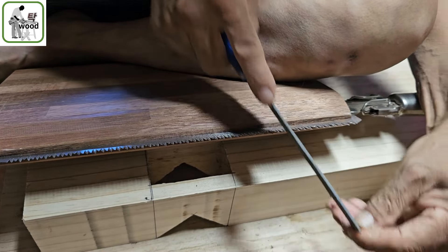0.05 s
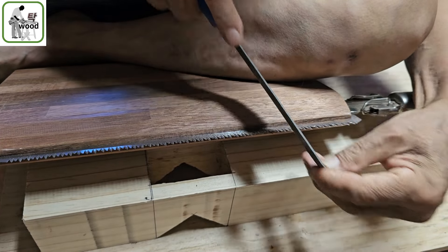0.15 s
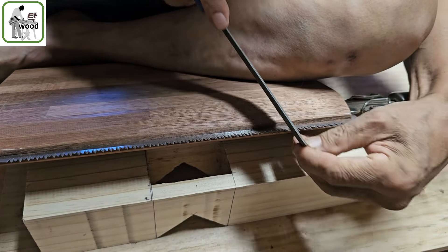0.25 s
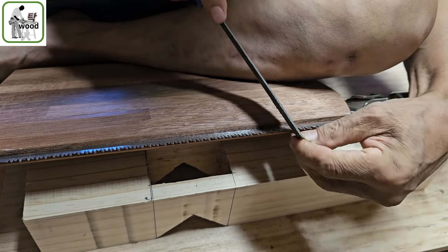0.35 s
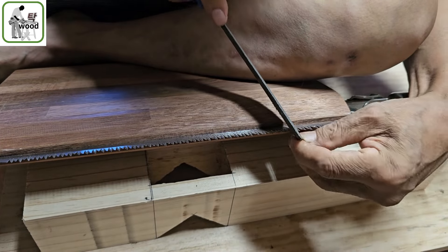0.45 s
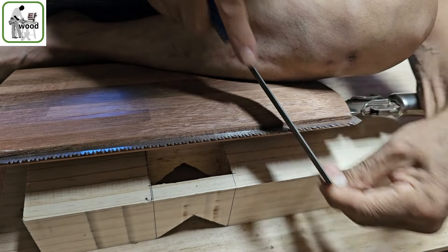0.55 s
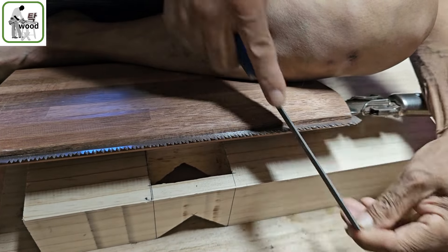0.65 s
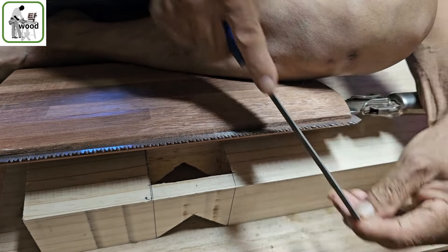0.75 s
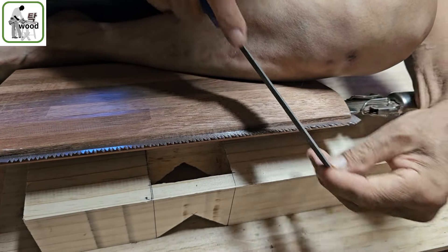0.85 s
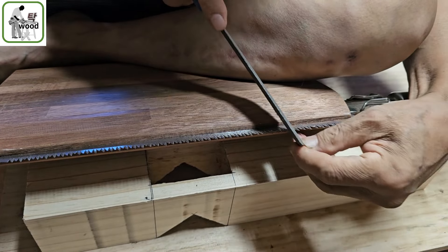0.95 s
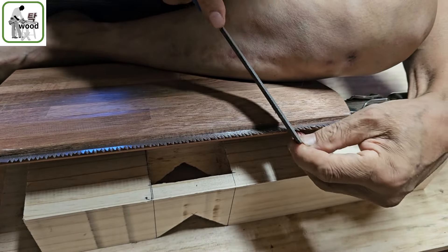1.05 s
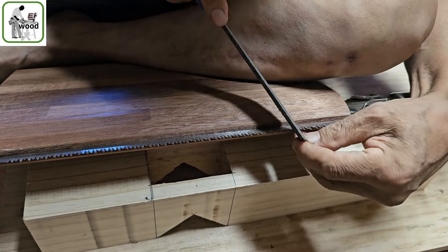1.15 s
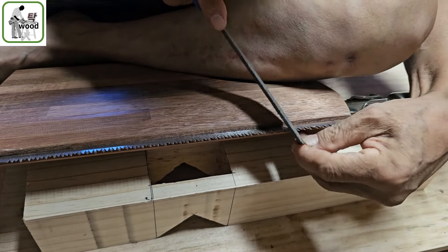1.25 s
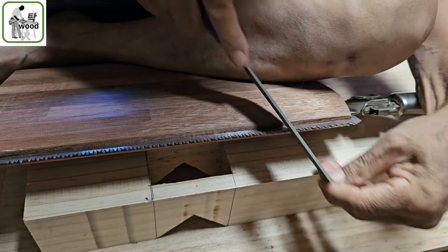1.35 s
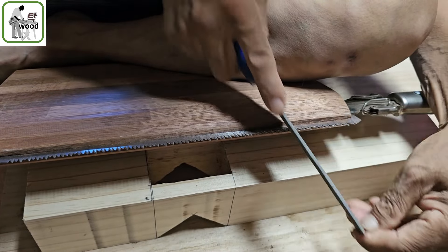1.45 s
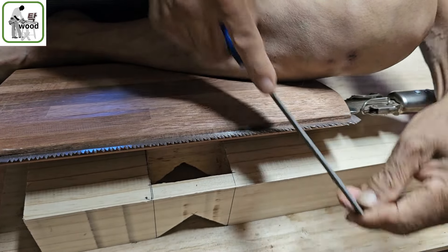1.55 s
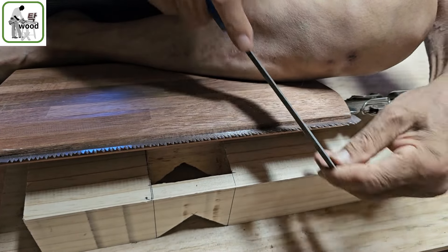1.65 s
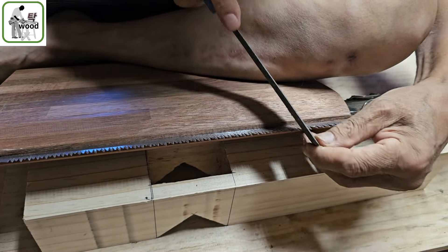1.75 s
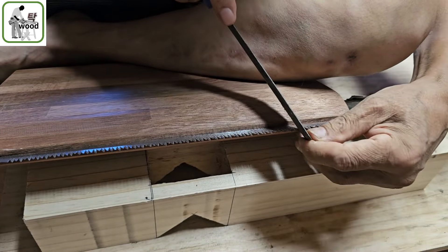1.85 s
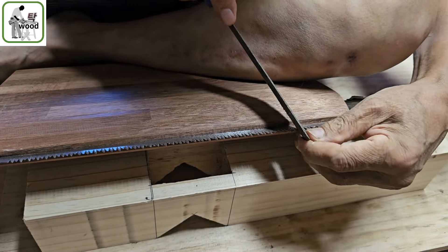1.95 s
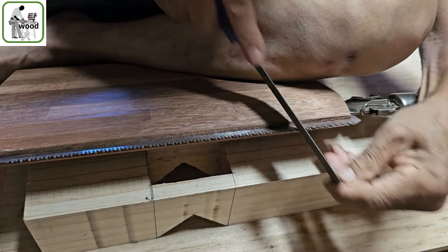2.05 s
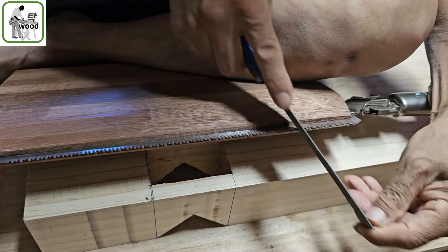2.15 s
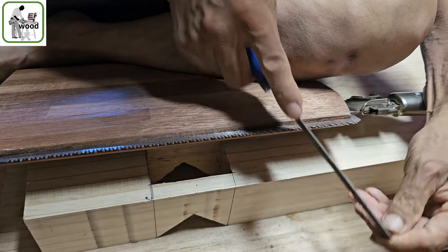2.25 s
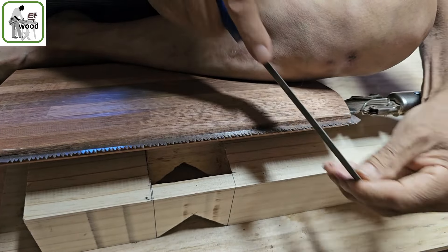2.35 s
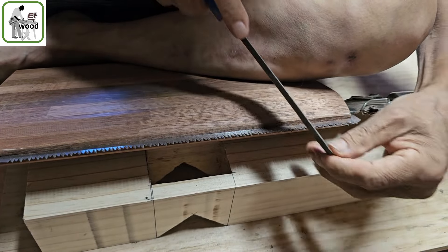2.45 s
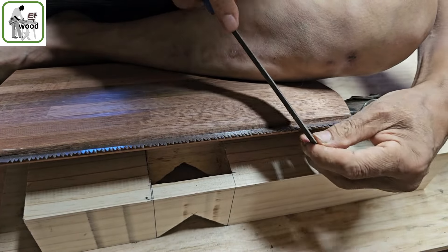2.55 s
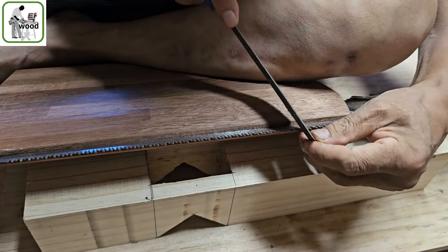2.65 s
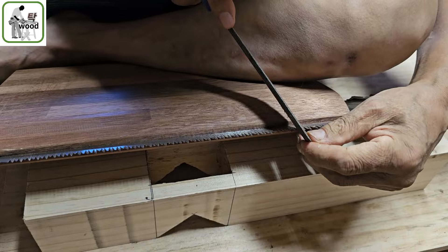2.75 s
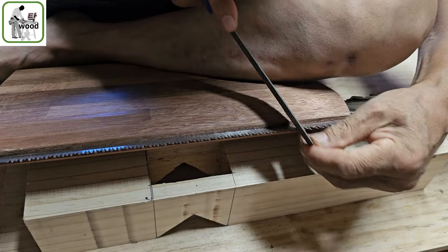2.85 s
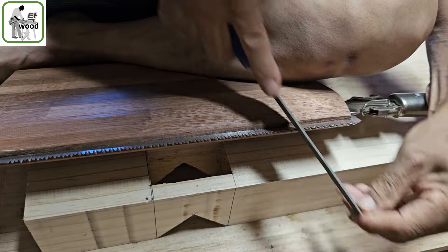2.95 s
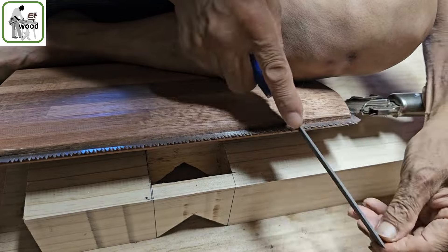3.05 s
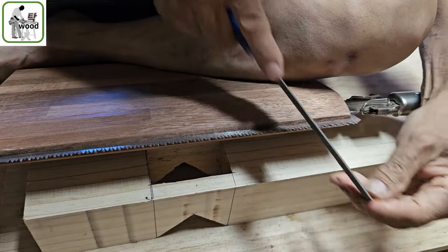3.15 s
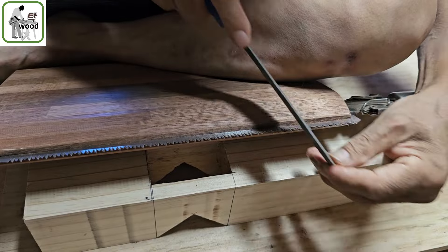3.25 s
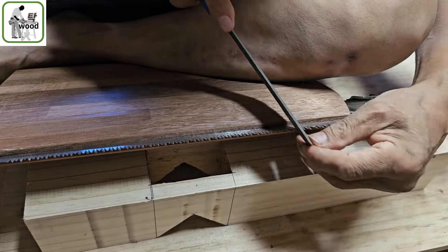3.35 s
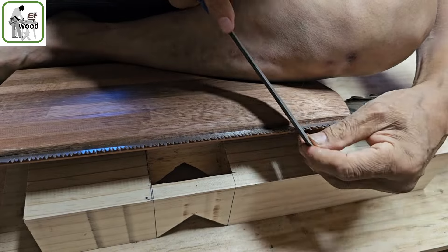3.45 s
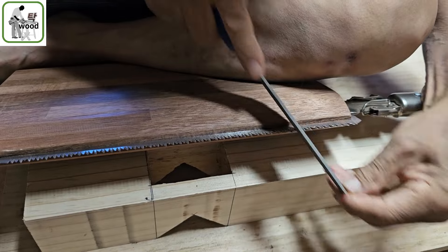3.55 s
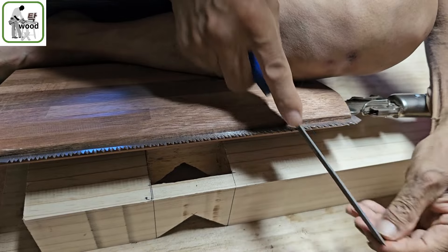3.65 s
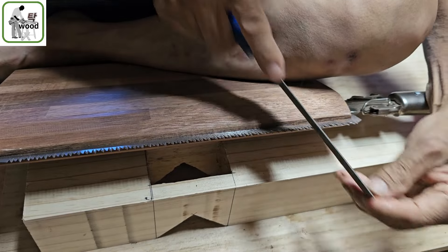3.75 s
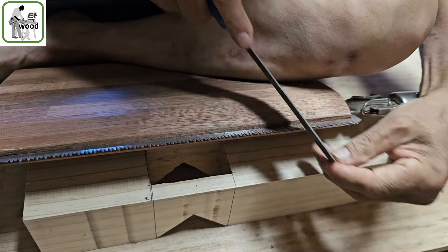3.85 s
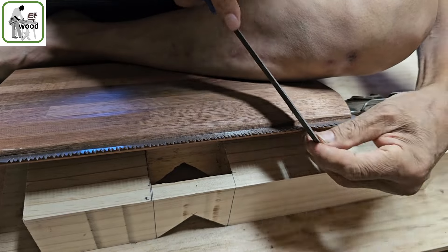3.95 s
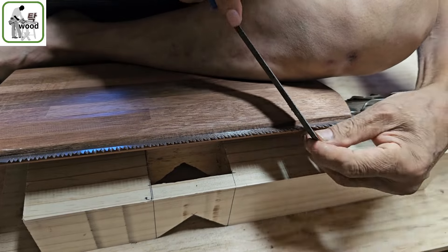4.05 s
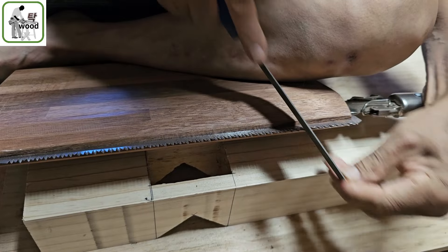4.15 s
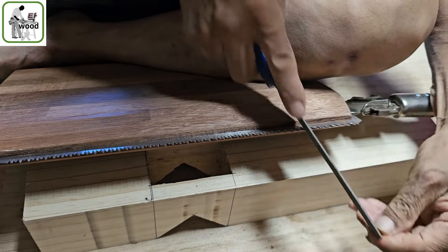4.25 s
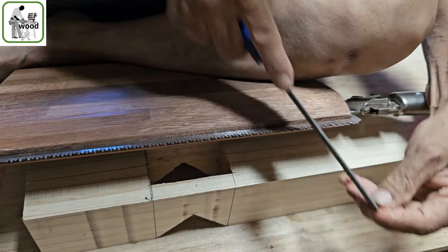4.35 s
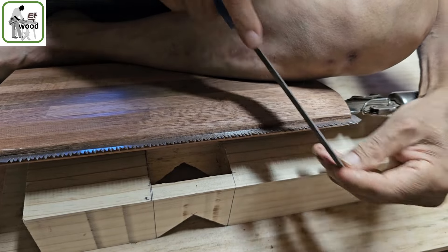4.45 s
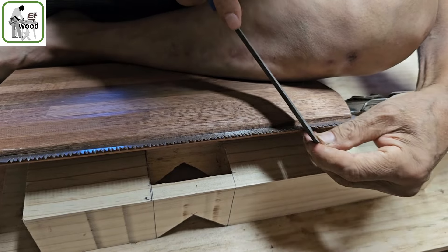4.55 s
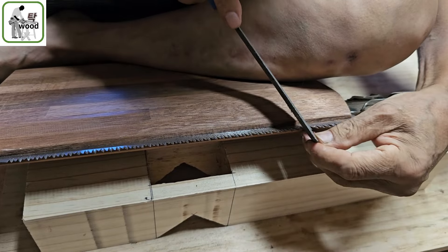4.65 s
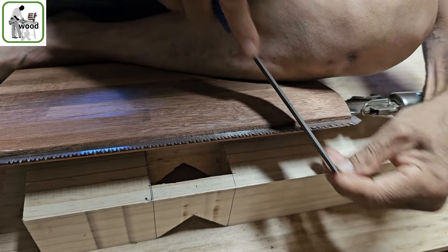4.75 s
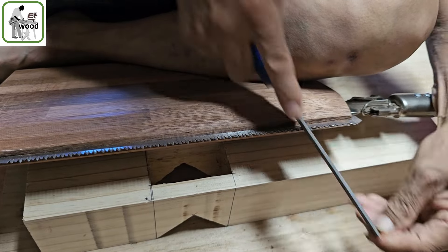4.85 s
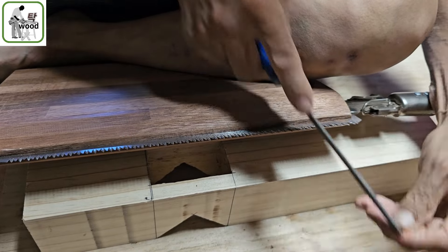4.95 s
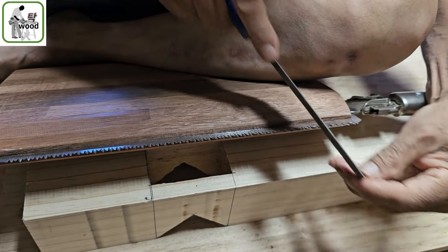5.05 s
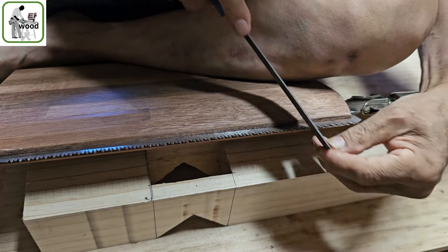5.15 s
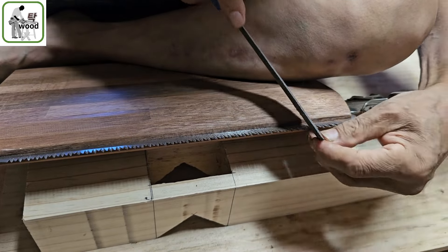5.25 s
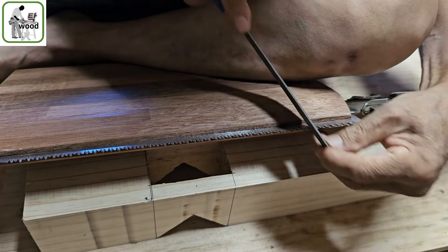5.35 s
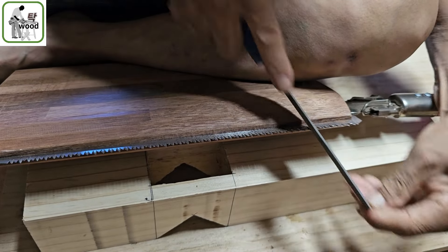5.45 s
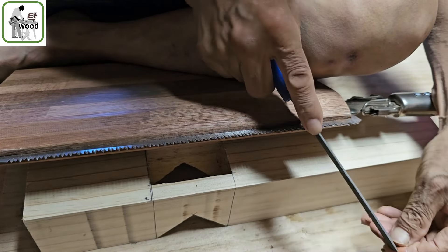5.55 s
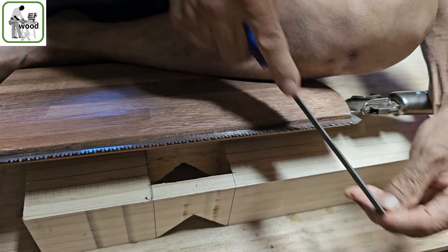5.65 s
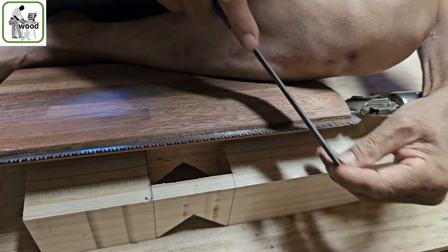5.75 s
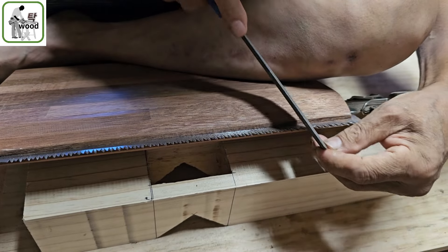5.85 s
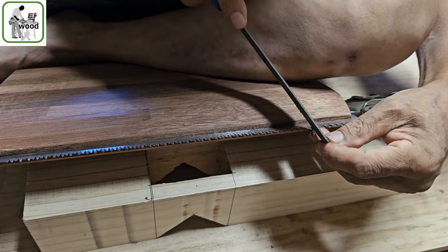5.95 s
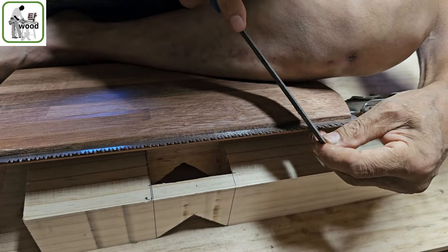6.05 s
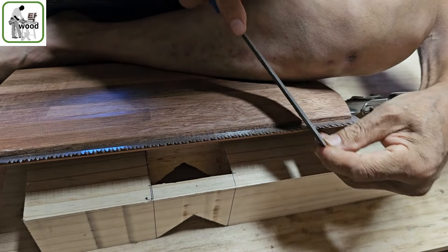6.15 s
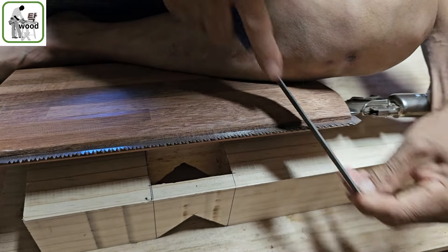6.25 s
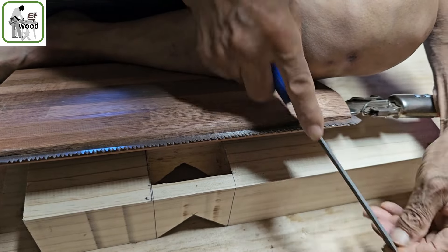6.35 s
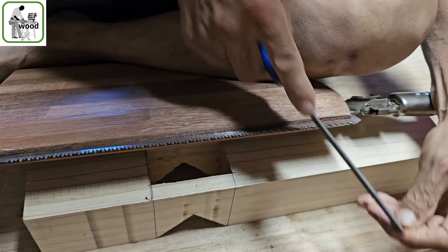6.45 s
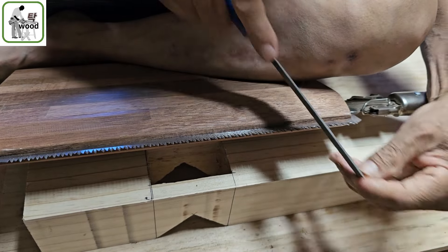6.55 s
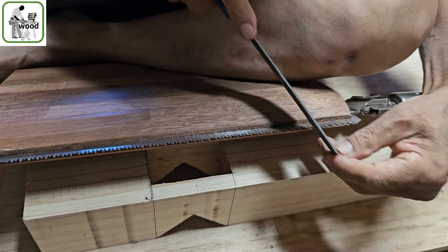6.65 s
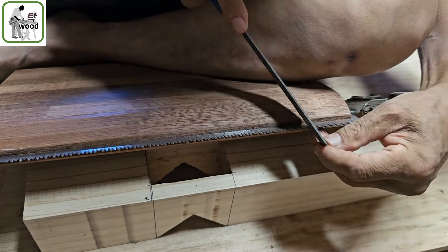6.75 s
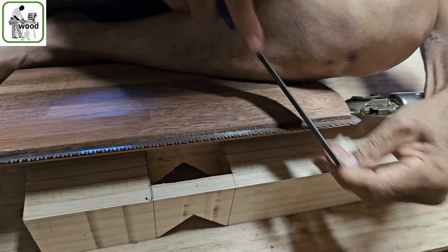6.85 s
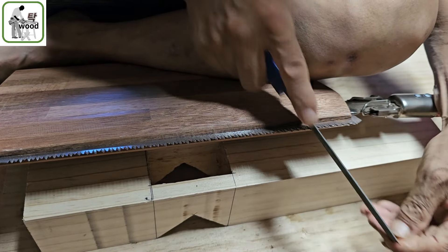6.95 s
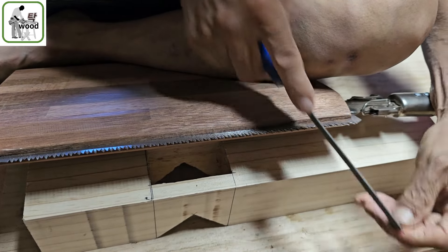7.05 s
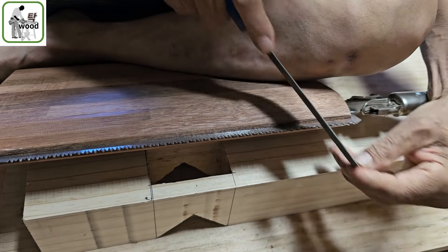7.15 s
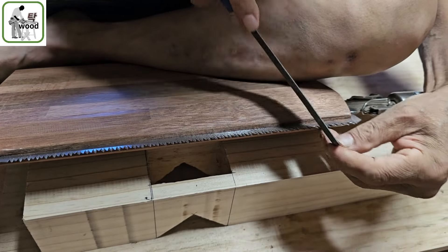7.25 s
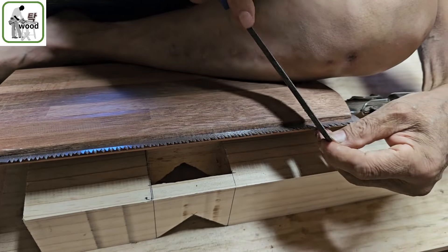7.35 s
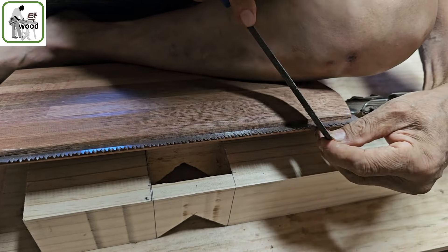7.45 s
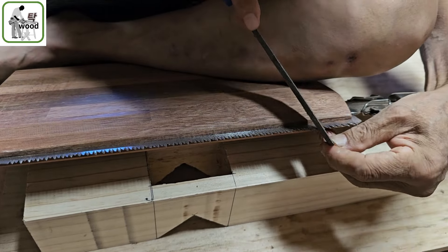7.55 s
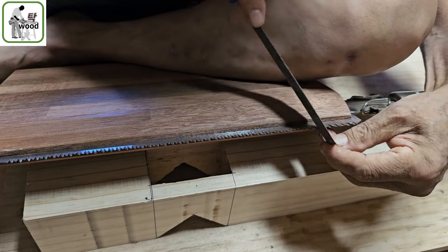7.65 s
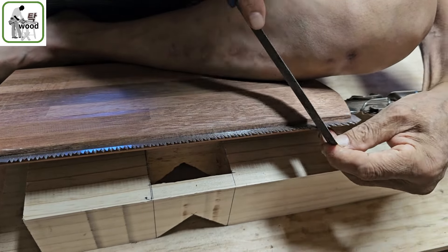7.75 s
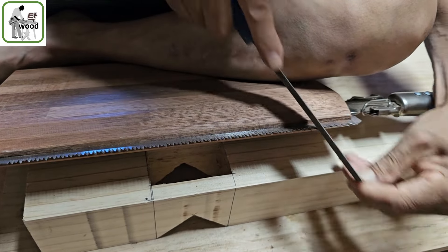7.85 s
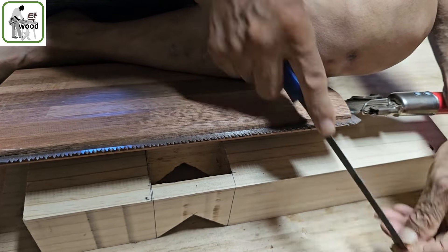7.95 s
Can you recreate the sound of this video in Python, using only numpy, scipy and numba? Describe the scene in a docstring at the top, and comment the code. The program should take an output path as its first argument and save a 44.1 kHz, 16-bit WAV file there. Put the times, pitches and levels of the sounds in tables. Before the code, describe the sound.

Twelve brief gritty file strokes on a clamped saw blade, ticking and ringing, with a small squeak midway and faint hiss and buzz beneath.

```python
"""A slim steel file is pushed in short strokes across the teeth of a handsaw clamped in a wooden jig.
Its ridges catch as a dense shower of random ticks that rasp and ring boards, blade and file in a small room.
Sharp taps of the file on a tooth, light brushes and squeaks come in between, and a click near the end.
Under it lie hiss and mains harmonics, sinking as a noise suppressor closes after each stroke."""
import sys
import numpy as np
from scipy import signal
from scipy.fft import rfft, irfft, next_fast_len
from scipy.io import wavfile
from scipy.ndimage import uniform_filter1d
from numba import njit

SR = 44100
rng = np.random.default_rng(int(sys.argv[2]) if len(sys.argv) > 2 else 0)


def bounce(signal):
    """Save signal as a 16-bit WAV file at the path given by the first command-line argument."""
    frames = np.transpose(np.atleast_2d(signal))
    limited = np.clip(frames, -1, 1)
    pcm = np.round(limited * 32767).astype(np.int16)
    wavfile.write(sys.argv[1], SR, pcm)


N = 352359


def amp(db):
    """Amplitude factor of a level in dB."""
    return 10 ** (np.asarray(db) / 20)


def unit(x):
    """Scale to an rms of 1."""
    return x / np.sqrt(np.mean(x ** 2))


def on_log(table, hz):
    """Read (freq_hz, value) points on a log-frequency axis."""
    freq_hz, value = np.transpose(table)
    return np.interp(np.log(hz + 1), np.log(freq_hz), value)


def colour(x, table, scale=0.96):
    """Causal filter whose gain is scale times the (freq_hz, gain_db) points, from the folded cepstrum."""
    size = 2048
    gain_db = scale * on_log(table, np.fft.rfftfreq(size, 1 / SR))
    cepstrum = irfft(gain_db * np.log(10) / 20)
    # folding makes the filter minimum phase
    cepstrum[1:size // 2] *= 2
    cepstrum[size // 2 + 1:] = 0
    impulse = irfft(np.exp(rfft(cepstrum)))
    wide = next_fast_len(N + size)
    return irfft(rfft(np.atleast_2d(x), wide) * rfft(impulse, wide), wide)[:, :N]


def ring(x, modes):
    """Sum of resonances excited by x, neighbours in opposite phase."""
    total = 0
    for k, (pitch_hz, width_hz, level_db) in enumerate(modes):
        b, a = signal.iirpeak(pitch_hz, pitch_hz / width_hz, fs=SR)
        total = total + (-1) ** k * amp(level_db) * signal.lfilter(b, a, x)
    return total


def wander(rate_hz):
    """Random levels held 1 / rate_hz s and smoothed; rms 1."""
    hold = int(SR / rate_hz)
    steps = np.repeat(rng.standard_normal(N // hold + 1), hold)
    return unit(uniform_filter1d(steps, hold)[:N])


# Pressure of the file in each stroke, touch-down to lift-off: lists of time_s, rasp_db (before layer trims)
STROKE_PRESSURE = [
    [(0.0, -33), (0.032, -41), (0.07, -52)],
    [(0.537, -43), (0.569, -33.5), (0.581, -37), (0.615, -29.5), (0.685, -38.5), (0.73, -50)],
    [(1.346, -45.5), (1.374, -37.5), (1.44, -41), (1.45, -32), (1.518, -45), (1.53, -52.5)],
    [(2.048, -38), (2.078, -38), (2.09, -29.5), (2.118, -27.5), (2.174, -41.5), (2.246, -42), (2.26, -50)],
    [(2.897, -56), (2.913, -40), (2.977, -31), (3.09, -47.5)],
    [(3.515, -66.5), (3.553, -44.5), (3.599, -38), (3.661, -35.5), (3.71, -46.5)],
    [(4.152, -56), (4.162, -51.5), (4.18, -32), (4.242, -31.5), (4.276, -35.5), (4.294, -33.5), (4.35, -46)],
    [(4.78, -36.5), (4.864, -33.5), (4.912, -34.5), (4.94, -44.5)],
    [(5.413, -43), (5.435, -34.5), (5.509, -28.5), (5.587, -41.5), (5.61, -47.5)],
    [(6.214, -53), (6.254, -41.5), (6.262, -32.5), (6.276, -36.5), (6.298, -27), (6.332, -31.5),
     (6.42, -48)],
    [(6.872, -49), (6.898, -37), (6.956, -34.5), (7.022, -37.5), (7.04, -48)],
    [(7.835, -44.5), (7.863, -32.5), (7.969, -37), (7.977, -28), (7.99, -36.5)],
]
# How each stroke's grip lets the parts ring, in dB over the rasp (before drift, follow and layer trims):
# boards_start_db, boards_middle_db, boards_end_db, hum_start_db, hum_middle_db, hum_end_db,
# overtones_db, file_ring_db, steel_db, then the blade hum's hum_start_hz, hum_end_hz
STROKE_GRIPS = [(7.5, 1.5, 4.5, -1, -3, -2, -2, -32, 8.5, 447, 461),
                (-4.5, -6.5, -1.5, 3.5, 1.5, -5, 3, -7, 1, 463, 460),
                (-11.5, -4, -8.5, 9, 9, 8, 6.5, -6, 6, 452, 460),
                (-14.5, -6.5, -5.5, 2.5, -7.5, -10, 0.5, -4, 6, 470, 380),
                (-18, 2, -1.5, 9.5, -3.5, 3.5, -4, -4.5, 2.5, 430, 466),
                (-1, -11.5, -9, -5, -12, -10, 2, -16, 3, 455, 466),
                (-4, -3.5, 2.5, 4.5, -4, -4, -4, -10, 1.5, 473, 470),
                (-4, 0, -2, 8, 1, -1.5, -2, -4.5, 5, 437, 483),
                (-8.5, -5.5, -7, 8.5, -9, -1.5, -2, 0.5, 4.5, 465, 470),
                (7, -5.5, -13, 4, 3, 5, 1, 5, 5, 475, 468),
                (-6.5, -7.5, 3.5, 2.5, 3.5, 6, 5, 4.5, 6, 480, 465),
                (5, -12, 3, -4, 4, -1.5, 1, -18, -1, 458, 463)]
# Change from the start of a stroke to its end: overtones_db, file_ring_db, steel_db
GRIP_DRIFT = [1, -3.5, 5]
# The file brushes the saw between strokes: start_s, length_s, rasp_db,
# then dB over the rasp: boards_db, hum_db, file_and_steel_ring_db
BRUSH_CONTACTS = [(5.252, .14, -67, -7, 2, 2), (6.79, 0.061, -71, -2, -2, -6), (7.49, 0.081, -73, 1, 0, -2),
                  (7.559, 0.037, -48.5, 6.5, 12, -5), (7.7, .022, -51, 15, 1, -10)]
BRUSH_OVERTONES_DB, BRUSH_HUM_HZ = 5, 459
STROKE_LIFT_DB_PER_S, BRUSH_LIFT_DB_PER_S = 345, 597


def contacts():
    """Strokes and brushes alike: pressure points, each part's dB over the rasp, hum pitch, lift speed."""
    found = []
    for points, grip in zip(STROKE_PRESSURE, STROKE_GRIPS):
        parts = [grip[:3], grip[3:6]]
        for over_db, drift_db in zip(grip[6:9], GRIP_DRIFT):
            parts.append(over_db + np.array([-.5, 0, .5]) * drift_db)
        found.append((np.array(points), parts, grip[9:], STROKE_LIFT_DB_PER_S))
    for start_s, length_s, rasp_db, boards_db, hum_db, ring_db in BRUSH_CONTACTS:
        points = np.array([(start_s, rasp_db), (start_s + length_s, rasp_db)])
        parts = [boards_db, hum_db, BRUSH_OVERTONES_DB, ring_db, ring_db]
        found.append((points, parts, [BRUSH_HUM_HZ] * 2, BRUSH_LIFT_DB_PER_S))
    return sorted(found, key=lambda contact: contact[0][0, 0])


PARTS = ["boards", "hum", "overtones", "file_ring", "steel"]
# Share of a pressure change each part follows, as plain ratios: boards, hum, overtones, file_ring, steel
PRESSURE_FOLLOW = [0.75, 0.64, 1.12, 0.84, 0.9]
MIDDLE_RASP_DB = -38.5  # the level that those shares pivot on
TOUCH_DB_PER_S = 1800


def contact_gain(layer):
    """Gain of one layer over time: quick touch, pressure, steady lift; parts follow pressure by their share."""
    gain = np.zeros(N)
    for points, parts, _, lift_db_per_s in contacts():
        start, end = points[0, 0], points[-1, 0]
        i = np.arange(max(int((start - .04) * SR), 0), min(int((end + .2) * SR), N))
        t = i / SR
        level_db = np.interp(t, *points.T)
        if layer != "rasp":
            part = PARTS.index(layer)
            over_db = np.interp(t, np.linspace(start, end, 3), np.resize(parts[part], 3))
            # the pivot stays within the pressures this contact reaches
            middle_db = np.clip(MIDDLE_RASP_DB, points[:, 1].min(), points[:, 1].max())
            level_db = level_db + over_db + (PRESSURE_FOLLOW[part] - 1) * (level_db - middle_db)
        level_db = level_db - TOUCH_DB_PER_S * np.maximum(start - t, 0)
        level_db = level_db - lift_db_per_s * np.maximum(t - end, 0)
        gain[i] = np.maximum(gain[i], amp(level_db))
    return gain


def ticks(rate_hz, spread_db, top_db):
    """Ridges catching on the tooth at random moments, a few harder."""
    hit = rng.random(N) < rate_hz / SR
    strength_db = np.minimum(spread_db * rng.exponential(size=N), top_db)
    return unit(-1. * hit * amp(strength_db))


# Blade and boards are wide, so each port hears another part of them: freq_hz, shared_over_own_db
PORT_SHARING = [(60, 1.5), (170, 14.5), (300, 4), (600, 4), (1500, -6), (4000, -1), (8000, -8)]


def grit_at_ports():
    """Ticks that both ports hear alike plus ticks that only one hears, under a juddering pressure."""
    both, left, right = (ticks(rate_hz=3300., spread_db=3.1, top_db=12) for _ in range(3))
    # split the power between shared and own ticks
    alike = [(hz, -10 * np.log10(1 + amp(-2 * db))) for hz, db in PORT_SHARING]
    apart = [(hz, -10 * np.log10(1 + amp(2 * db))) for hz, db in PORT_SHARING]
    judder_db = 0.73 * wander(60) + 0.24 * wander(300)
    return unit((colour(both, alike) + colour([left, right], apart)) * amp(judder_db))


@njit
def glide(x, g, k):
    """State-variable band-pass whose centre moves; g = tan(pi f / SR), k = width / f."""
    y = np.empty_like(x)
    for c in range(len(x)):
        band, low = 0., 0.
        for i in range(len(g)):
            v = (band + g[i] * (x[c, i] - low)) / (1 + g[i] * (g[i] + k[i]))
            band = 2 * v - band
            low = low + 2 * g[i] * v
            y[c, i] = k[i] * v
    return y


HUM_WIDTH_HZ = 16.3


def blade_hum(force):
    """The lowest blade mode shifts with the place where the file presses."""
    bends = []
    for points, _, pitch_hz, _ in contacts():
        bends += [(points[0, 0], pitch_hz[0]), (points[-1, 0], pitch_hz[-1])]
    hz = np.interp(np.arange(N) / SR, *np.transpose(bends))
    return glide(force, np.tan(np.pi * hz / SR), HUM_WIDTH_HZ / hz)


RING_UP_MS = 7


def rung_up(gain):
    """Low modes need a moment to build up; the grip damps them at once."""
    lag = int(RING_UP_MS * SR / 1000)
    late = np.concatenate([np.full(lag, gain[0]), gain])[:N]
    return np.minimum(gain, late)


LOCK = 0.33  # how far the slips fall in step with a low mode, 0-1


def locked(mode):
    """Slips that fall in step with a mode keep its swing more even than chance would."""
    power = uniform_filter1d(np.mean(unit(mode) ** 2, axis=0), size=SR // 80)
    return unit(mode / (power + 0.075) ** (LOCK / 2))


# Broad rasp tone, scaled by colour(): freq_hz, gain_db
RASP_TONE = [(30, -42), (70, -24.5), (130, -6), (300, 1), (700, 1), (1300, 2.5), (1900, -4.5), (3000, -6.5),
             (4700, -8), (5600, -14), (6500, -19.5), (8000, -35), (9500, -52.5), (12000, -90)]
# Ringing modes of the wooden boards, level within the group: pitch_hz, width_hz, level_db
BOARD_MODES = [(170.3, 8.2, 14.5), (95, 13, -26), (311.7, 23.6, -5.5)]
# Blade overtones, level within the group: pitch_hz, width_hz, level_db
BLADE_OVERTONES = [(635.3, 13.7, 1.5), (789.3, 5.8, 2.5), (925, 16, -3.5), (1062, 58, -3)]
# Ringing modes of the file, level within the group: pitch_hz, width_hz, level_db
FILE_MODES = [(1405, 41, 11), (1546, 116, 5)]
# High steel ring, level within the group: pitch_hz, width_hz, level_db
STEEL_MODES = [(1917, 37, -2), (2697, 280, -1), (4000, 16, -26), (4580, 25, -4.5)]


def filing():
    """The same ticks drive the broad rasp and each ringing part; the grip loads and damps the parts differently."""
    grit = grit_at_ports()
    broad = colour(grit, RASP_TONE)
    # the rasp is levelled by its treble in the left port
    treble = signal.butter(2, 1500, "high", fs=SR, output="sos")
    treble_level = np.std(signal.sosfilt(treble, broad[0]))
    rasp = amp(0.5) * contact_gain("rasp") * broad / treble_level
    boards = amp(2.0) * rung_up(contact_gain("boards")) * locked(ring(grit, BOARD_MODES))
    hum = amp(-1.16) * rung_up(contact_gain("hum")) * locked(blade_hum(grit))
    overtones = amp(-5.0) * contact_gain("overtones") * unit(ring(grit, BLADE_OVERTONES))
    file_ring = amp(-5.5) * contact_gain("file_ring") * unit(ring(grit, FILE_MODES))
    steel = amp(-14.0) * contact_gain("steel") * unit(ring(grit, STEEL_MODES))
    return rasp + boards + hum + overtones + file_ring + steel


ROOM_T60_S, ROOM_DB = 0.12, -13.5


def room(x):
    """A weak dense tail of decaying noise behind the close sound, another in each port."""
    t = np.arange(int(.35 * SR)) / SR
    decay = np.exp(-np.log(1000) * t / ROOM_T60_S)
    build_up = 1 - np.exp(-t / 0.0037)
    tail = rng.standard_normal((2, len(t))) * decay * build_up
    return x + amp(ROOM_DB) * signal.fftconvolve(x, unit(tail) / np.sqrt(len(t)), axes=1)[:, :N]


# Hiss tone, scaled by colour(): freq_hz, gain_db
HISS_TONE = [(40, -19.5), (100, -9), (200, 0), (500, -0.5), (1100, -3), (2500, -3.5), (5500, -5.5),
             (7000, -16), (9500, -40), (12000, -63.5)]
# Lowest and strong mains harmonics, level within the buzz: multiple (of MAINS_HZ), level_db
BUZZ_HARMONICS = [(1, -24.5), (2, -13.5), (3, 2.5), (5, 7), (6, 1.5), (9, 5.5), (10, 3.5), (14, 2.5),
                  (16, 1), (18, 0), (20, -5.5), (21, 1.5), (24, -2), (25, -8), (28, 1), (30, -3), (38, -6),
                  (54, -16), (60, -3.5)]
# Background fader before layer trims, suppressor and port gain: time_s, level_db
BACKGROUND_LEVEL = [(0, -71), (1.2, -71), (2, -75.5), (3.3, -73), (4.6, -77), (5.9, -72), (7.3, -78),
                    (7.99, -76.5)]
MAINS_HZ = 50
# the remaining harmonics: level, slope and random scatter, within the buzz
WEAK_DB, WEAK_DB_PER_MULTIPLE, WEAK_SCATTER_DB = -9.5, -0.03, 5
HISS_TRIM_DB, BUZZ_TRIM_DB = 3.5, 1.5


def background():
    """Hiss, mostly shared by the ports, and mains harmonics that waver a little."""
    mid, left, right = unit(colour(rng.standard_normal((3, N)), HISS_TONE))
    hiss = mid + 0.32 * np.array([left, right])
    multiples = np.arange(1, 61)
    harmonic_db = WEAK_DB + WEAK_DB_PER_MULTIPLE * multiples
    harmonic_db = harmonic_db + WEAK_SCATTER_DB * rng.standard_normal(len(multiples))
    for multiple, strong_db in BUZZ_HARMONICS:
        harmonic_db[multiples == multiple] = strong_db
    cycle = np.arange(SR // MAINS_HZ) * MAINS_HZ / SR
    phase = rng.random((2, len(multiples), 1))
    sines = np.sin(2 * np.pi * (multiples[:, None] * cycle + phase))
    shapes = np.sum(amp(harmonic_db)[:, None] * sines, axis=1)
    # a second shape drifts in and out, so each harmonic wavers in its own way
    buzz = np.resize(shapes[0], N) + 0.096 * wander(7) * np.resize(shapes[1], N)
    level_db = np.interp(np.arange(N) / SR, *np.transpose(BACKGROUND_LEVEL))
    return amp(level_db) * (amp(HISS_TRIM_DB) * hiss + amp(BUZZ_TRIM_DB) * unit(buzz))


# Opens on loud sound, closes fast, then slowly: closing_t60_s, opening_db (at -30 dB of sound)
SUPPRESSOR_STAGES = [(.5, 18), (3.5, -1)]


def suppressor(sound):
    """Gain on the background, from the power of the sound that has just passed."""
    power = np.mean(sound ** 2, axis=0) * 1000  # 1 at -30 dB
    power_gain = 1
    for closing_t60_s, opening_db in SUPPRESSOR_STAGES:
        pole = np.exp(-2 * np.log(1000) / (closing_t60_s * SR))
        recent = signal.lfilter([1 - pole], [1, -pole], power)
        power_gain = power_gain + amp(2 * opening_db) * recent
    return np.sqrt(power_gain)


# Taps of the file on a tooth, level before tap trims; the last row is a click at the cut-off end:
# start_s, level_db, hollowness (0-1), scrape_decay_ms (time constant)
TAP_HITS = [(0.536, -26, 0.1, 2.1), (1.371, -17, 0.33, 2.0), (1.450, -14, 0.4, 1.9), (1.897, -38.5, 0, 8.4),
            (2.05, -9, 0.05, 1.9), (2.242, -19, 0.04, 3), (2.912, -23.5, 0.76, 1.9),
            (4.151, -16.5, 0.19, 2.2), (4.177, -14.5, 0.35, 4.1), (4.245, -12.5, 0.17, 3.4),
            (4.785, -27, 0.57, 2.7), (5.298, -13.5, 0.06, 2.1), (5.411, -46, 0.2, 2.7),
            (5.895, -16.5, 0.06, 8), (5.9, -29, 0.32, 20), (6.217, -26, 0.1, 10), (6.26, -15, 0.2, 6.6),
            (6.871, -43, 0.1, 3.9), (6.894, -21, 0.2, 1.8), (7.56, -52.5, 0.1, 1.7),
            (7.704, -28.5, 0.75, 1.6), (7.841, -24, 0.4, 1.5), (7.976, -9, 0.2, 12)]
# Tap tone, scaled by colour(): freq_hz, gain_db
TICK_TONE = [(60, -50), (300, -18), (700, -1), (2000, -3), (4700, -7.5), (6500, -21), (9500, -48)]
# Knock on blade and boards, level before the knock trim: pitch_hz, width_hz, level_db
KNOCK_MODES = [(170, 44, 4), (470, 90, 4.5), (950, 84, -19)]


def taps():
    """A sharp tick with a short noise scrape behind it; hollow ones knock on blade and boards."""
    sharp, hollow = np.zeros((2, N)), np.zeros(N)
    t = np.arange(int(0.032 * SR)) / SR
    for start_s, level_db, hollowness, scrape_decay_ms in TAP_HITS:
        i = int(start_s * SR)
        shared, *own = rng.standard_normal((3, len(t)))
        scrape = 0.24 * (shared + 1.14 * np.array(own)) * np.exp(-1000 * t / scrape_decay_ms)
        scrape[:, 0] -= 1.6  # the tick itself
        sharp[:, i:i + len(t)] += amp(level_db) * scrape[:, :N - i]
        hollow[i] -= amp(level_db) * hollowness
    return amp(1) * colour(sharp, TICK_TONE) + amp(34.0) * ring(hollow, KNOCK_MODES)


# The file creeps on a tooth and the blade sings in swells (level before its waver):
# peak_s, peak_level_db, rise_db_per_s, fall_db_per_s
SQUEAK_SWELLS = [(5.253, -55, 2995, 117), (5.301, -35, 900, 650), (5.353, -44, 350, 500),
                 (5.394, -48, 700, 300), (5.418, -25.5, 1000, 1798)]
SQUEAK_HZ, SQUEAK_HZ_PER_DB = 436, 0.55  # pitch at -50 dB; it rises as the blade sings louder


def squeak():
    """Regular stick-slip on the lowest blade mode: a sine wavering in pitch and level."""
    t = np.arange(N) / SR
    swells = []
    for peak_s, peak_db, rise, fall in SQUEAK_SWELLS:
        swells.append(peak_db - rise * np.maximum(peak_s - t, 0) - fall * np.maximum(t - peak_s, 0))
    level_db = np.max(swells, axis=0)
    hz = SQUEAK_HZ + SQUEAK_HZ_PER_DB * np.maximum(level_db + 50, -20)
    phase = 2 * np.pi * np.cumsum(hz * (1 + 0.004 * wander(150))) / SR
    return amp(level_db + 1.0 * wander(90)) * np.sqrt(2) * np.sin(phase)


# Stereo lean, half applied to each side: freq_hz, left_minus_right_db
PORT_LEAN = [(60, -1), (100, -1), (180, 3.5), (320, 0), (560, 2.5), (980, 2.5), (1710, 0), (2990, 4.5),
             (5220, -0.5), (9130, 1)]


def scene():
    """The saw in its room, leaning to the left port, over the suppressed background."""
    close = room(filing() + squeak() + taps())
    # the saw lies nearer the left port
    left = colour(close[0], PORT_LEAN, scale=1 / 2)
    right = colour(close[1], PORT_LEAN, scale=-1 / 2)
    ports = np.concatenate([left, right])
    # the background is slightly louder in the left port
    port_gain = amp([[.7], [-.7]])
    return ports + suppressor(ports) * background() * port_gain


TOP_HZ, OFFSET = 9550, .0013  # treble limit; constant shift, full scale = 1


def record(dry):
    """The top is cut by a steep low-pass; a small constant offset is added."""
    low_pass = signal.ellip(10, .2, 80, TOP_HZ, fs=SR, output="sos")
    return signal.sosfilt(low_pass, dry) + OFFSET


dry = scene()
out = record(dry)
bounce(out)
```